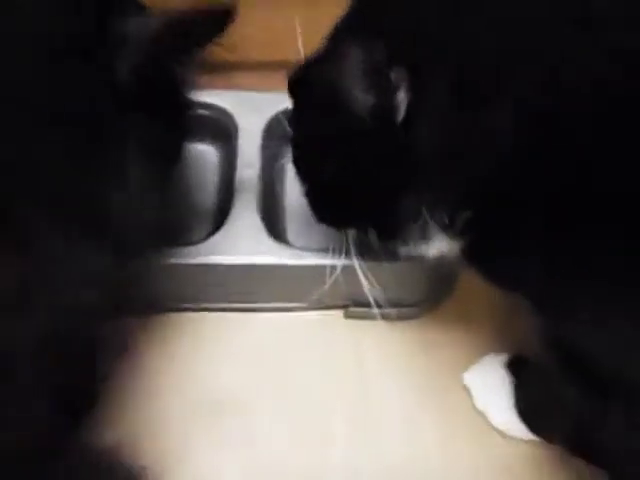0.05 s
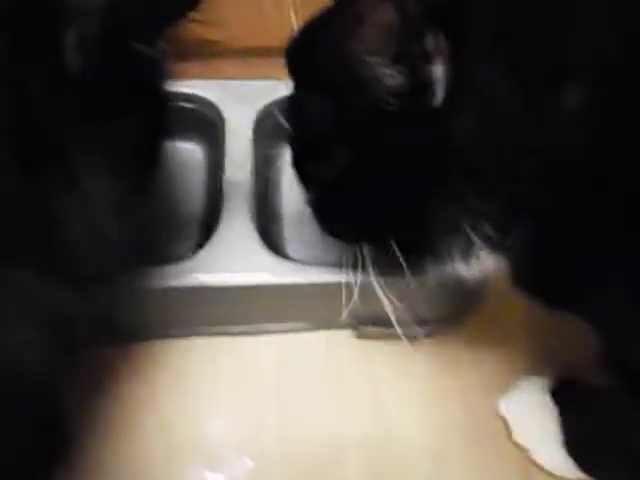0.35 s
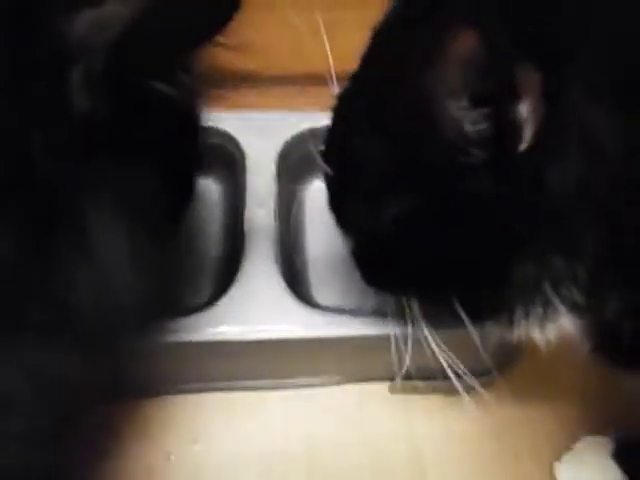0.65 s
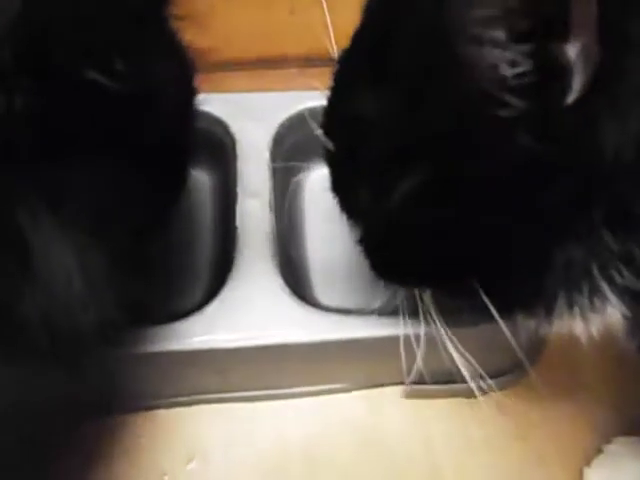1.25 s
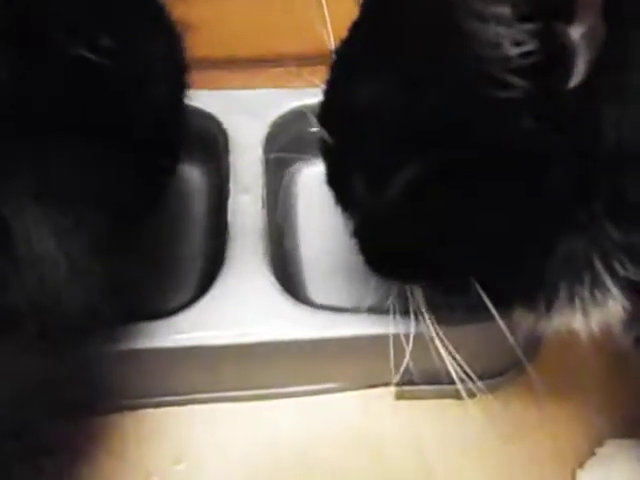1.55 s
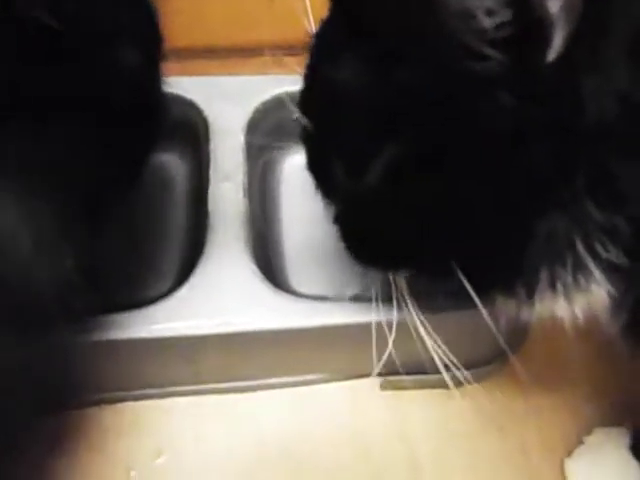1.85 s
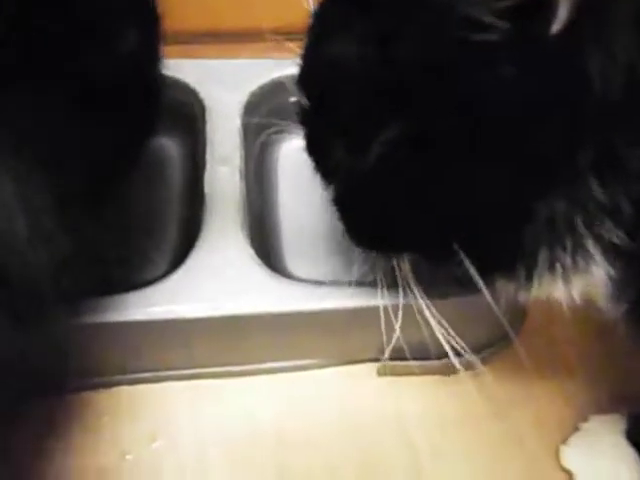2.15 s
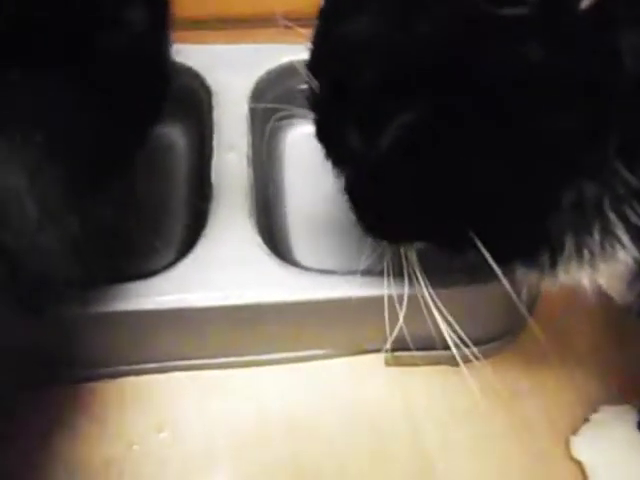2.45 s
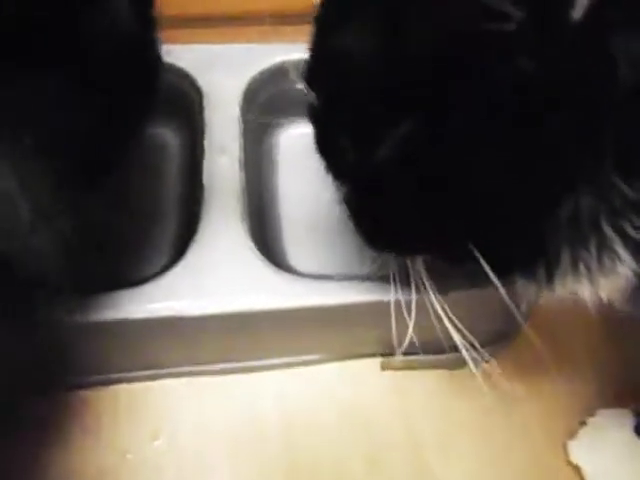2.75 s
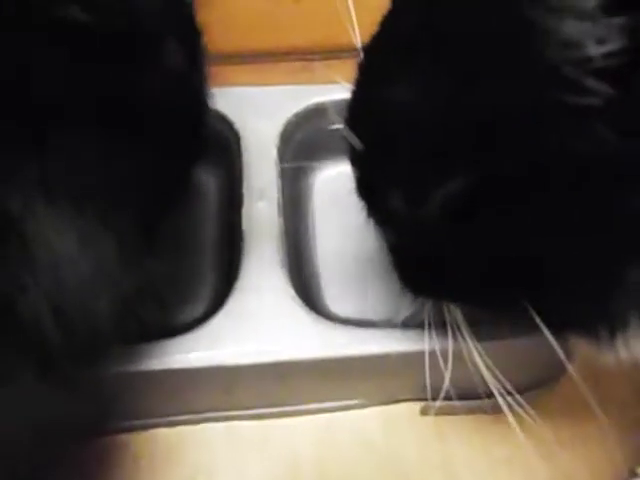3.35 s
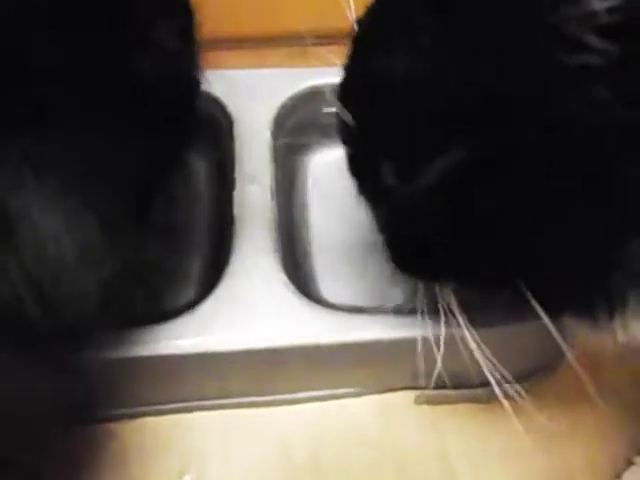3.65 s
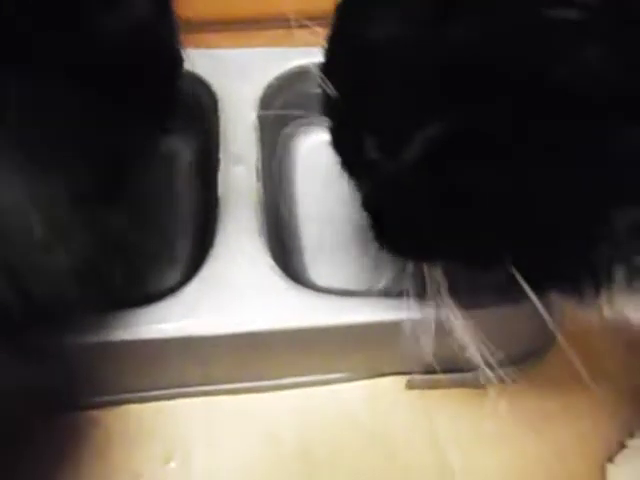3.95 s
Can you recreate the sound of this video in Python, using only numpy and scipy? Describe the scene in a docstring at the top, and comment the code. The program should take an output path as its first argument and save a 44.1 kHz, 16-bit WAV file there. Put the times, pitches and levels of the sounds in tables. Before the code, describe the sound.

Two cats lap water from a plastic bowl, close up in a small quiet room. Soft wet tongue ticks and low mouth smacks start right away. From about 1.3 seconds the lapping gets busier, with tiny bubble pops, easing briefly around 2.3 seconds. It then carries on, with the sharpest wet click near 3.9 seconds. A low appliance hum and faint hiss run through all 4 seconds.

```python
"""Two cats lapping water

Close up, at a plastic double bowl in a small quiet room. Each lap is a soft crackle of wet tongue:
water films snap, small bubbles pop, a few ticks ring on, mouths smack. The bowl rings along.
Behind them a household appliance hums over a faint, slightly ringing hiss."""
import sys
import numpy as np
from scipy import signal
from scipy.fft import rfft, irfft
from scipy.io import wavfile

SR = 44100
rng = np.random.default_rng(int(sys.argv[2]) if len(sys.argv) > 2 else 0)


def unload_audio(sound):
    """Save the sound as a 16-bit wav file, at the path given as the first command line argument."""
    columns = np.transpose(np.atleast_2d(sound))
    # keep every value between -1 and 1, then stretch to whole-number steps
    steps = np.round(np.clip(columns, -1, 1) * 32767)
    wavfile.write(sys.argv[1], SR, steps.astype(np.int16))


N = 176400

# room hiss spectrum: freq_hz, relative_density_db
HISS_SPECTRUM = [(15, 16.5), (30, 17), (65, 10.5), (105, 9.5), (150, 12.5), (210, 7.5), (330, 6), (500, 4),
                 (620, -1.5), (880, -1), (1050, 1), (1400, -1.5), (1650, -3.5), (2800, -5.5), (3300, -7),
                 (4400, -3.5), (6000, -7.5), (7500, -10), (10000, -10.5), (12000, -15.5), (16000, -18)]
# hiss resonances: freq_hz, width_hz, lift_db
HISS_RESONANCES = [(1212, 102, 9.5), (1040, 40, 5.5), (1475, 30, 4), (3000, 20, 8), (4110, 40, 4),
                   (4535, 50, 3), (6520, 60, 6.5), (7040, 150, 6.5), (7915, 45, 6), (8554, 20, 10),
                   (9243, 22, 8)]
# hiss likeness between channels: freq_hz, correlation
HISS_CORRELATION = [(25, 0.54), (70, 0.24), (160, 0.83), (500, 0.55), (1200, 0.87), (4000, 0.65),
                    (8000, 0.56), (15000, 0.39)]
# hiss balance: freq_hz, left_minus_right_db
HISS_BALANCE = [(100, -4), (600, 2.5), (1200, 2), (3000, -1), (7000, -3), (14000, -1)]
# appliance hum lines: pitch_hz, base_level_db
HUM_LINES = [(120, -63.5), (149.5, -64), (181, -70.5), (245, -79), (393, -77), (689, -75.5), (737.5, -70)]
# swell common to those lines: time_s, gain_db
HUM_SWELL = [(0, 1), (.8, 0.5), (1.3, 2), (1.8, -1), (2.35, 2.5), (3.1, -0.5), (4, 0.5)]
# lowest hum: time_s, level_db
DRONE_LEVELS = [(0.0, -46.5), (0.04, -48.5), (0.33, -47), (0.78, -53.5), (0.89, -48), (0.98, -51),
                (1.21, -46.5), (1.28, -51.5), (2.68, -53.5), (2.77, -50), (2.84, -61), (2.92, -49.5),
                (3.06, -46.5), (3.25, -60), (3.31, -56), (3.52, -55.5), (3.83, -48), (4.0, -51)]
# motor line that comes and goes: time_s, level_db
MOTOR_LEVELS = [(0.0, -64.5), (0.13, -63), (0.52, -71), (1.16, -62), (1.54, -72.5), (2.18, -64),
                (2.64, -72.5), (3.53, -61), (3.9, -79.5), (4.0, -61)]
# echoes off bowl and floor: delay_s, gain_db
ECHOES = [(.0008, -23.5), (.0017, -16.5), (.0037, -14.5), (.0069, -20)]
# bowl resonances: freq_hz, gain_db, t60_s
BOWL_MODES = [(1580, -25, .013), (2760, -22, .014)]
# balance of the cats: freq_hz, left_minus_right_db
CAT_BALANCE = [(1500, 0.5), (2800, 0), (4200, -4.5), (6000, -5), (9000, -5.5), (14000, -2)]
# cats settling: peak_s, half_width_s, level_db, centre_hz, spread_oct
RUSTLE = (-0.64, 0.6, -58, 4600, .6)
# low mouth smacks: start_s, level_db, centre_hz
GULPS = [(.056, -46.5, 970), (.151, -43, 980), (.247, -43, 850), (.385, -44.5, 956), (.605, -42.5, 630),
         (0.613, -44.5, 1150), (1.057, -46, 870), (1.276, -42.5, 942), (1.832, -43.5, 1290),
         (2.649, -46, 900), (3.34, -45.5, 850), (3.594, -46, 890), (3.802, -43.5, 780), (3.812, -49, 1050)]
# thin ringing after sharp ticks: start_s, level_db, pitch_hz, decay_s
PINGS = [(.853, -45, 5880, 0.043), (1.489, -43, 5690, .026), (1.603, -45, 5690, .022),
         (3.577, -41.5, 5900, 0.032)]
# bubble pops: start_s, level_db, pitch_hz, decay_s
POPS = [(0.461, -39, 2530, 0.0005), (0.515, -47, 2210, 0.0013), (0.678, -47, 1800, .001),
        (0.686, -43, 1450, 0.00073), (.754, -50.5, 2640, .0008), (0.8525, -39.5, 6240, .0007),
        (1.377, -39.5, 2120, 0.0036), (1.383, -42.5, 2870, 0.0013), (1.641, -46.5, 3730, .0012),
        (1.71, -45, 2230, 0.00099), (1.965, -46, 5900, .0004), (1.9697, -38.5, 5300, 0.00021),
        (2.015, -42.5, 5080, .0007), (2.186, -49.5, 1550, 0.0013), (2.421, -46, 6100, 0.0002),
        (2.716, -42, 5170, 0.00055), (2.775, -45.5, 1990, 0.00066), (2.821, -45.5, 6950, 0.00053),
        (2.919, -51, 10500, 0.00092), (3.007, -47, 1900, .0015), (3.095, -48, 1510, 0.0013),
        (3.1089, -29.5, 4080, 0.00037), (3.326, -46, 4900, .0008), (3.3531, -30, 4870, 0.00025),
        (3.358, -36, 4700, 0.00035), (3.6422, -31.5, 4200, 0.00018), (3.773, -48.5, 1690, 0.0022),
        (3.8491, -36, 4800, 0.00044), (3.855, -24.5, 4170, 0.00068), (3.8555, -40, 2740, 0.00086),
        (3.8554, -35, 5430, 0.00063), (3.8589, -28.5, 3950, 0.0009)]
# wet tongue ticks: start_s, level_db, centre_hz, spread_oct
TICKS = [(.1405, -46, 2910, 0.62), (.4615, -43, 3260, 0.65), (0.4767, -45, 2920, 0.62),
         (0.544, -45, 3920, 0.83), (0.851, -44, 1560, 0.27), (0.9698, -46, 1600, 0.2),
         (0.6841, -45, 2100, 0.94), (0.8512, -38.5, 4970, 0.52), (0.9706, -40, 3845, 0.74),
         (1.088, -45, 5340, 0.29), (1.227, -45, 1700, 0.3), (1.345, -46.5, 5820, 0.18),
         (1.398, -47, 1980, 1.1), (1.399, -39.5, 1580, 0.19), (1.489, -40.5, 6560, 0.55),
         (1.555, -50, 5200, 0.36), (1.6015, -34, 3960, 0.42), (1.684, -41, 4660, 0.43),
         (1.727, -47, 3040, .45), (1.752, -38, 6760, 0.27), (1.821, -48, 4400, 0.18),
         (1.825, -49, 1746, 0.22), (1.8835, -40.5, 5670, 0.15), (1.884, -42, 2800, 0.25),
         (1.9355, -42, 7560, 0.4), (1.985, -46.5, 1900, 0.27), (1.9996, -44.5, 2500, 1.2),
         (2.054, -41.5, 2230, 0.17), (2.0596, -42, 2800, 0.97), (2.1077, -38, 1685, 0.36),
         (2.109, -33, 3630, 0.55), (2.109, -43, 12900, 0.65), (2.4826, -44, 2900, 0.33),
         (2.5105, -41, 2520, 0.38), (2.5122, -41.5, 7100, 0.27), (2.5273, -44, 6200, 0.33),
         (2.5406, -37.5, 6340, 0.22), (2.562, -51, 6640, .15), (2.5739, -43, 2600, 0.4),
         (2.5851, -42.5, 3190, 0.47), (2.642, -42.5, 3930, 0.53), (2.659, -41, 4720, 0.2),
         (2.85, -44, 4930, 0.32), (2.854, -46, 2670, .45), (2.8653, -46, 3900, 0.49),
         (2.8816, -45, 3800, .7), (2.901, -50, 2200, .4), (2.975, -43.5, 1680, 0.3), (2.978, -48, 5700, .2),
         (2.993, -47, 2200, .45), (3.0563, -43.5, 5190, 0.21), (3.083, -46, 4900, .15),
         (3.1285, -37, 3370, 0.48), (3.226, -41.5, 6050, 0.83), (3.258, -38, 6460, 0.27),
         (3.3524, -35, 3500, 0.61), (3.3829, -36, 3800, 0.38), (3.49, -46, 8050, 1),
         (3.4966, -42, 1900, 0.15), (3.514, -41.5, 5800, 0.4), (3.515, -42.5, 2300, 0.12),
         (3.5772, -42, 1570, 0.13), (3.577, -36.5, 3930, 0.7), (3.595, -46, 4100, .35),
         (3.6096, -35.5, 4130, 0.39), (3.7708, -40, 5200, 0.2), (3.8042, -42.5, 3030, 0.32),
         (3.8229, -41.5, 4700, 1.1), (3.8546, -28.5, 3900, 0.42), (3.8592, -38, 3900, 0.46),
         (3.878, -42, 3100, 0.49)]
# crackle of each lap: middle_s, length_s, level_db, centre_hz
LAPS = [(0.465, 0.061, -67, 2950), (0.561, 0.092, -64.5, 2770), (0.92, 0.081, -65, 3010),
        (1.047, 0.072, -65.5, 2580), (1.319, 0.054, -61, 2470), (1.411, 0.049, -70, 2010),
        (1.551, 0.034, -62.5, 3500), (1.711, 0.11, -64.5, 3560), (1.81, 0.052, -63.5, 3080),
        (1.891, 0.067, -61.5, 3160), (2.024, 0.13, -68, 3400), (2.533, .12, -64, 4500),
        (2.656, 0.062, -64, 3900), (2.885, 0.098, -61.5, 3500), (3.01, .1, -66, 2700),
        (3.13, 0.15, -64, 4270), (3.225, .07, -60.5, 2940), (3.331, 0.042, -60.5, 2300),
        (3.387, 0.044, -65, 3960), (3.516, 0.056, -64, 3180), (3.616, 0.1, -63, 3740),
        (3.814, 0.076, -63, 2720), (3.883, .05, -57.5, 4210), (3.959, 0.071, -64.5, 2620)]
# room decay: freq_hz, t60_s
ROOM_T60 = [(500, 0.19), (4000, 0.21), (7000, 0.27), (15000, 0.048)]

RING_RISE_S, WOBBLE_STEP_S = 0.0011, 0.0011
BAND_LIMIT_HZ = 15950


def amp(db):
    """Decibels to gain."""
    return 10 ** (np.asarray(db) / 20)


def unit(x):
    """Scale to rms 1."""
    return x / np.sqrt(np.mean(x ** 2) + 1e-20)


def unit_energy(x):
    """Scale to the energy of 1 ms at rms 1."""
    return x / np.linalg.norm(x) * np.sqrt(SR / 1000)


def at_hz(table, hz):
    """Interpolate on a log-frequency axis."""
    freq_hz, value = np.transpose(table)
    return np.interp(np.log(hz + 1), np.log(freq_hz + 1), value)


def gain_curve(table):
    """Gain per sample from (time_s, level_db) points."""
    return amp(np.interp(np.arange(N) / SR, *np.transpose(table)))


def add(mix, start_s, sound):
    """Mix a sound in at start_s."""
    part = mix[max(round(start_s * SR), 0):][:len(sound)]
    part += sound[:len(part)]


def wander(rate_hz):
    """Slow random motion, rms 1."""
    hz = np.fft.rfftfreq(N, 1 / SR)
    lowpass = np.exp(-(hz / rate_hz) ** 2) * (hz > 0)
    return unit(irfft(rfft(rng.standard_normal(N)) * lowpass, N))


def pan(x, balance):
    """Frequency-dependent stereo balance."""
    lean_db = at_hz(balance, np.fft.rfftfreq(2 * N, 1 / SR)) / 2
    return irfft(rfft(x, 2 * N) * amp([lean_db, -lean_db]))[:, :N]


def hiss(level_db=-52):
    """Steady room noise with narrow resonances."""
    hz = np.fft.rfftfreq(N, 1 / SR)
    left, other = rfft(rng.standard_normal((2, N)))
    correlation = at_hz(HISS_CORRELATION, hz)
    right = correlation * left + np.sqrt(1 - correlation ** 2) * other
    density_db = at_hz(HISS_SPECTRUM, hz)
    for freq_hz, width_hz, lift_db in HISS_RESONANCES:
        density_db += lift_db / (1 + (2 * (hz - freq_hz) / width_hz) ** 2)
    noise = irfft(np.array([left, right]) * amp(density_db), N)
    return amp(level_db) * pan(unit(noise), HISS_BALANCE)


def hum_line(pitch_hz, drift_hz=0.91):
    """Drifting sine, rms 1."""
    cycles = np.cumsum(pitch_hz + drift_hz * wander(rate_hz=3.6)) / SR
    return np.sqrt(2) * np.sin(2 * np.pi * (cycles + rng.random()))


def appliance_hum(waver_db=2.6):
    """Wavering motor lines over a low drone that swells and dips."""
    lines = sum(amp(db + waver_db * wander(rate_hz=6.4)) * hum_line(hz) for hz, db in HUM_LINES)
    drone = gain_curve(DRONE_LEVELS) * hum_line(pitch_hz=49.2, drift_hz=0.92)
    motor = gain_curve(MOTOR_LEVELS) * hum_line(pitch_hz=300)
    return drone + motor + gain_curve(HUM_SWELL) * lines


def room(x, tail_db=-10, rise_s=0.0021, mid_share=0.96):
    """Direct sound, near echoes and a short diffuse tail, mostly alike in both channels."""
    mid, side = rng.standard_normal((2, 20000))
    noise = np.sqrt(mid_share) * mid + np.sqrt(1 - mid_share) * np.array([side, -side])
    hz, t, bands = signal.stft(noise, SR, nperseg=256)
    decay = amp(-60 * t / at_hz(ROOM_T60, hz)[:, None])
    tail = signal.istft(bands * decay, SR, nperseg=256)[1]
    tail *= np.minimum(np.arange(tail.shape[1]) / SR / rise_s, 1)
    response = amp(tail_db) * tail / np.linalg.norm(tail[0])
    response[:, 0] += 1
    for delay_s, gain_db in ECHOES:
        response[:, round(delay_s * SR)] += amp(gain_db)
    return signal.fftconvolve(x[None], response, axes=1)[:, :N]


def bowl(x, size=14000):
    """The plastic bowl rings along in damped modes."""
    t = np.arange(size) / SR
    modes = sum(amp(gain_db) * unit(amp(-60 * t / t60_s) * np.cos(2 * np.pi * hz * t))
                for hz, gain_db, t60_s in BOWL_MODES)
    return x + signal.fftconvolve(x, modes / np.sqrt(size))[:N]


def click(centre_hz, spread_oct, skirt_db=-22.5, lowpass_hz=12800):
    """Band-shaped impulse: a water film's snap coloured by the mouth. Also a noise filter."""
    hz = abs(np.fft.fftfreq(512, 1 / SR)) + 20
    octaves = np.log2(hz / centre_hz)
    gain = np.exp(-(octaves / spread_oct) ** 2 / 2) + amp(skirt_db) / (1 + (octaves / 2) ** 4)
    gain /= np.sqrt(1 + (hz / lowpass_hz) ** 4)
    minimum_phase = np.exp(np.conj(signal.hilbert(np.log(gain))))
    return unit_energy(np.fft.ifft(minimum_phase).real)


def rustle(peak_s, half_width_s, level_db, centre_hz, spread_oct):
    """High noise like brushing fur; with peak_s below zero only its fade is heard."""
    noise = signal.oaconvolve(rng.standard_normal(N), click(centre_hz, spread_oct))[:N]
    envelope = np.exp(-((np.arange(N) / SR - peak_s) / half_width_s) ** 2)
    return amp(level_db) * unit(noise) * envelope


def gulp(centre_hz, decay_s=0.0034):
    """Short puff in the hollow of the mouth."""
    t = np.arange(2000) / SR
    puff = rng.standard_normal(len(t)) * np.sqrt(t) * np.exp(-t / decay_s)
    return unit_energy(np.convolve(click(centre_hz, spread_oct=0.52), puff))


def water_wobble(t, depth, steps):
    """Random fractional pitch shift from moving water."""
    return depth * np.interp(t / WOBBLE_STEP_S, np.arange(steps), rng.standard_normal(steps))


def ping(pitch_hz, decay_s, sag_per_s=0.5, overtone_ratio=1.065, overtone_db=-8):
    """Two close partials ring on after a tick, wobbling and sinking slightly."""
    t = np.arange(0, 5 * decay_s, 1 / SR)
    hz = pitch_hz * (1 - sag_per_s * t + water_wobble(t, depth=0.022, steps=256))
    phase = 2 * np.pi * np.cumsum(hz) / SR
    partials = np.sin(phase) + amp(overtone_db) * np.sin(overtone_ratio * phase)
    envelope = (1 - np.exp(-t / RING_RISE_S)) * np.exp(-t / decay_s)
    return unit_energy(envelope * partials)


def bubble_pop(pitch_hz, decay_s, glide_depth=0.053, glide_s=0.0027):
    """A tiny bubble swells and rings out, its pitch wobbling and rising slightly."""
    t = np.arange(0, 6 * decay_s + 3 * RING_RISE_S, 1 / SR)
    envelope = (1 - np.exp(-(t / RING_RISE_S) ** 2)) * np.exp(-t / decay_s)
    glide = glide_depth * (1 - np.exp(-t / glide_s))
    hz = pitch_hz * (1 + glide + water_wobble(t, depth=0.053, steps=128))
    return unit_energy(envelope * np.sin(2 * np.pi * np.cumsum(hz) / SR))


def tongue_tick(centre_hz, spread_oct, tear_s=0.00063, tear_db=1, size=256):
    """One snap, then about 1 ms of smaller ones as the water film tears."""
    decay = np.exp(-np.arange(size) / SR / tear_s)
    rips = rng.standard_normal(size) * decay * (1 - decay)
    snap = click(centre_hz, spread_oct)
    tear = amp(tear_db) * unit_energy(np.convolve(snap, rips))
    return unit_energy(np.pad(snap, (0, size - 1)) + tear)


def lap_crackle(length_s, centre_hz, rate_per_s=750, scatter_oct=1.194, bubble_share=0.65):
    """Tiny bubbles and clicks that swell and fade over one lap; rms 1."""
    out = np.zeros(int(length_s * SR) + 600)
    grains = rng.random((128, 5))[:int(length_s * rate_per_s)]
    for position, size_draw, up, down, kind in grains:
        size_db = 3.5 * min(-np.log(size_draw), 3)
        swell = np.sin(np.pi * position) ** 0.5
        hz = min(centre_hz * 2 ** (scatter_oct * (up - down)), BAND_LIMIT_HZ)
        if kind < bubble_share:
            grain = bubble_pop(hz, decay_s=4.3 / hz)  # 4.3 cycles
        else:
            grain = click(hz, spread_oct=0.6)
        add(out, position * length_s, swell * amp(size_db) * grain)
    return unit(out)


def lapping():
    """Tongue, water and mouth sounds of both cats."""
    out = np.zeros(N)
    for start_s, level_db, centre_hz, spread_oct in TICKS:
        add(out, start_s, amp(level_db) * tongue_tick(centre_hz, spread_oct))
    for start_s, level_db, pitch_hz, decay_s in POPS:
        add(out, start_s, amp(level_db) * bubble_pop(pitch_hz, decay_s))
    for start_s, level_db, pitch_hz, decay_s in PINGS:
        add(out, start_s, amp(level_db) * ping(pitch_hz, decay_s))
    for start_s, level_db, centre_hz in GULPS:
        add(out, start_s, amp(level_db) * gulp(centre_hz))
    for middle_s, length_s, level_db, centre_hz in LAPS:
        add(out, middle_s - length_s / 2, amp(level_db) * lap_crackle(length_s, centre_hz))
    return out


def scene():
    """Hiss and hum, with the cats slightly to the right."""
    background = hiss() + appliance_hum()
    cats = room(bowl(lapping() + rustle(*RUSTLE)))
    return background + pan(cats, CAT_BALANCE)


def record(dry):
    """Steep low-pass at the band limit."""
    lowpass = signal.firwin(511, BAND_LIMIT_HZ, window=("kaiser", 9), fs=SR)
    return signal.oaconvolve(dry, lowpass[None], "same")


dry = scene()
out = record(dry)
unload_audio(out)
```